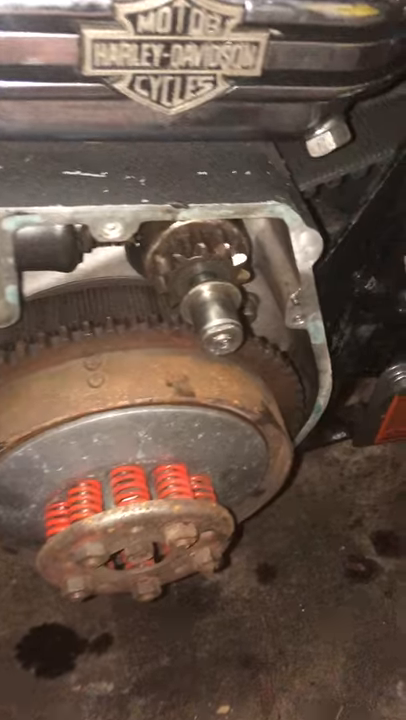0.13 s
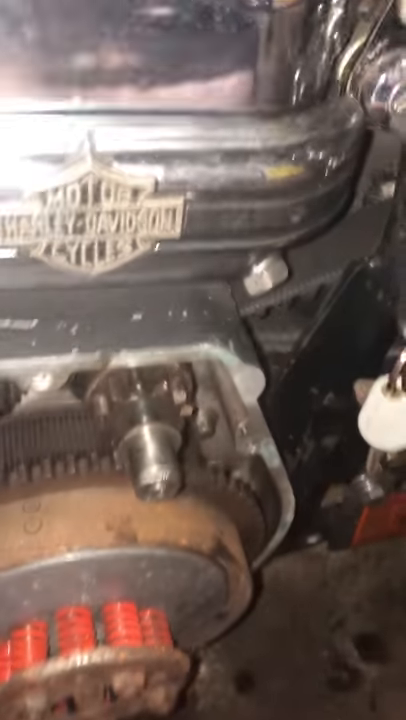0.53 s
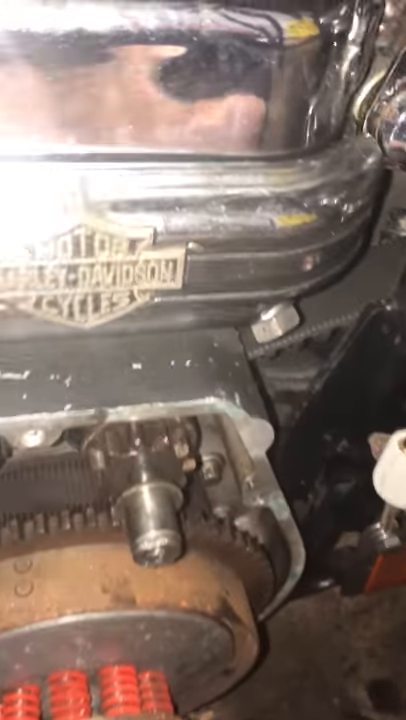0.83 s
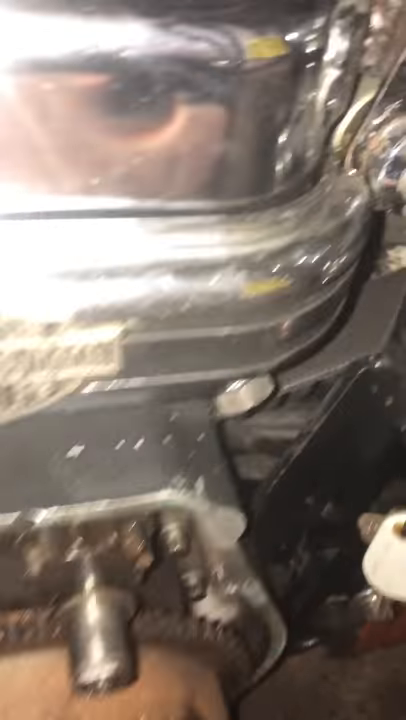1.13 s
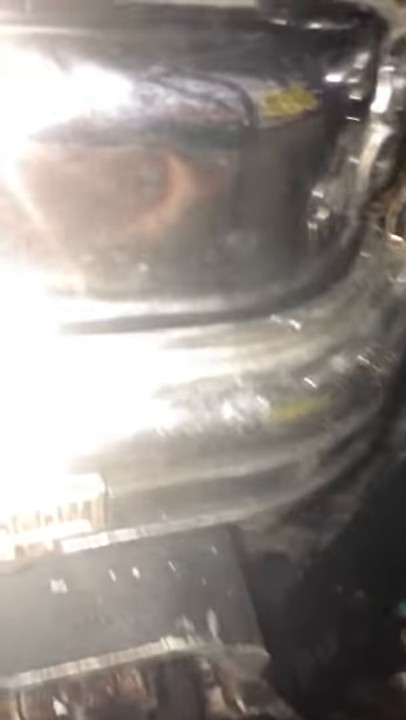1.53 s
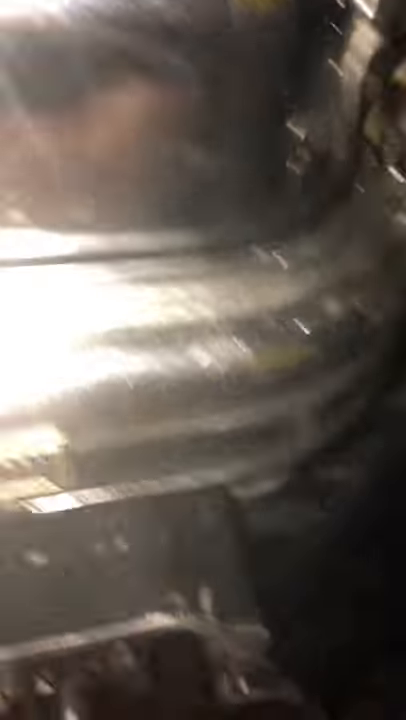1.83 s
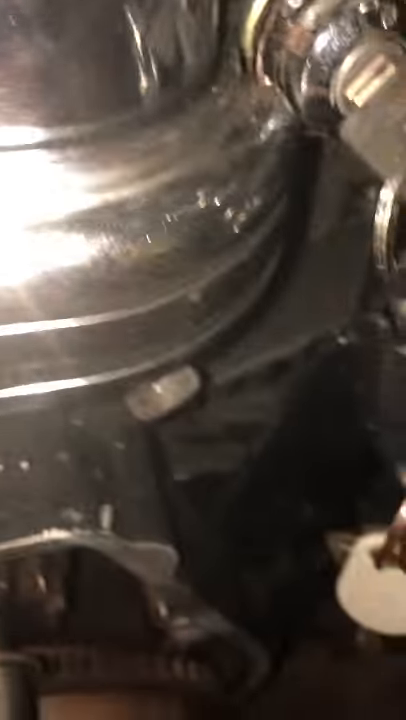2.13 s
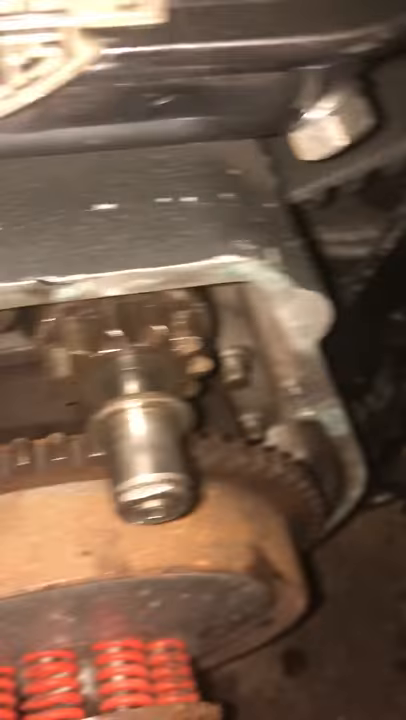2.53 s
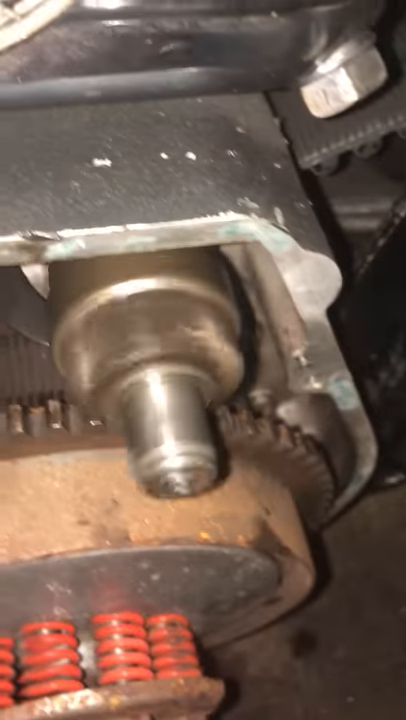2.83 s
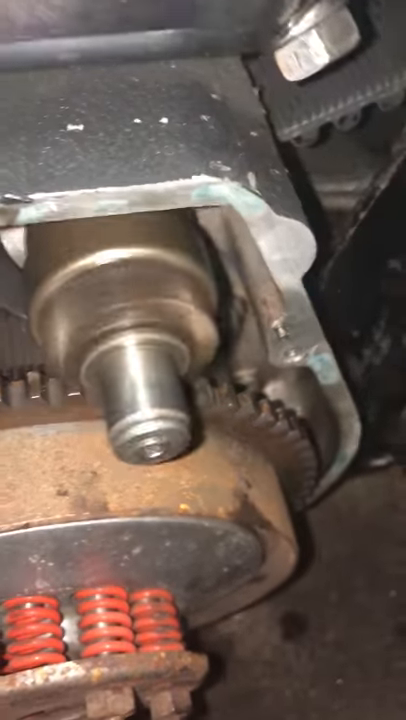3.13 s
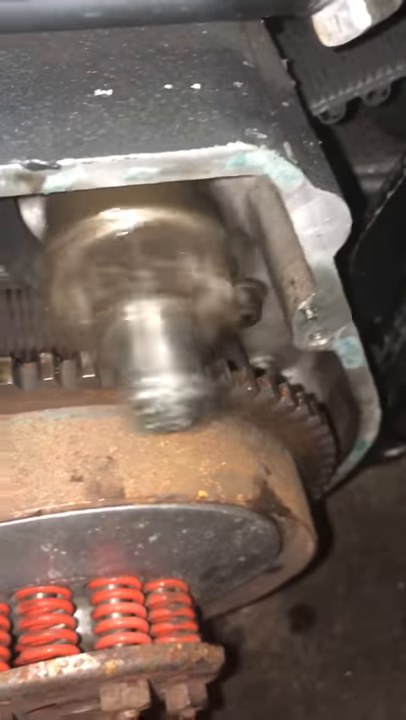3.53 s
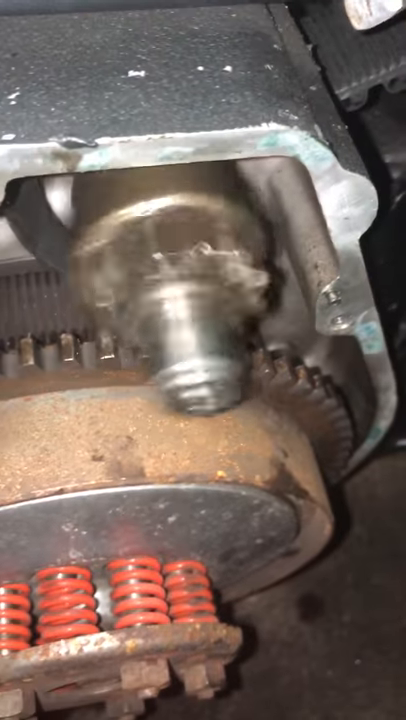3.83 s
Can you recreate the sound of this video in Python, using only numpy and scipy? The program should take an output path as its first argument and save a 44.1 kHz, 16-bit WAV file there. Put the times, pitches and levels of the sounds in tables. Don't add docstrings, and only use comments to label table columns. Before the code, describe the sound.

Starter motor slams its gear out, whines upward and chatters harshly after quiet handling clicks

```python
import sys
import numpy as np
from scipy import signal
from scipy.fft import rfft, irfft
from scipy.io import wavfile
from scipy.ndimage import uniform_filter1d

SR = 44100
rng = np.random.default_rng(int(sys.argv[2]) if len(sys.argv) > 2 else 0)


def ratio_of_db(decibels):
    return 10 ** (np.asarray(decibels, float) / 20)


def to_wav(s):
    ch = np.atleast_2d(s).T
    pcm = np.round(np.clip(ch, -1, 1) * 32767)
    wavfile.write(sys.argv[1], SR, pcm.astype(np.int16))


N = 176400
T = np.arange(N) / SR
START_S = 2.737

# f/Hz, level/dB
GRIND_SPECTRUM = [(250, -25.5), (1250, -9), (2200, -10), (3000, -12.5), (5500, -18.5), (15800, -32)]


def evened(x):
    return x / np.sqrt(np.mean(x ** 2) + 1e-20)


def curve(table, column):
    rows = np.array(table)
    return np.interp(T, rows[:, 0], rows[:, column])


def coloured(points):
    f, db = np.transpose(points)
    hz = np.fft.rfftfreq(N, 1 / SR)
    gain = ratio_of_db(np.interp(np.log(hz + 1), np.log(f), db, right=-90))
    return evened(irfft(rfft(rng.standard_normal(N)) * gain, N))


def resonate(x, hz, width):
    turn = np.exp(2j * np.pi * np.cumsum(hz * np.ones(len(x))) / SR)
    r = np.exp(-np.pi * width / SR)
    return 2 * (turn * signal.lfilter([1 - r], [1, -r], x / turn)).real


def fuzzy(hz, width):
    once = resonate(rng.standard_normal(N), hz, width)
    return evened(resonate(once, hz, width))


def bursts(times, dbs, t60, rise_s):
    spikes, t = np.zeros(N), T[:9000]
    np.add.at(spikes, (np.asarray(times) * SR).astype(int), ratio_of_db(dbs))
    envelope = (1 - np.exp(-t / rise_s)) * ratio_of_db(-60 * t / t60)
    return signal.oaconvolve(spikes, envelope)[:N]


def window(start, length, edge_s):
    return np.clip(np.minimum(T - start, start + length - T) / edge_s, 0, 1)


def rattle(depth_db, smooth):
    return ratio_of_db(depth_db * evened(uniform_filter1d(rng.standard_normal(N), int(smooth))))


def body(x, modes):
    out = 0
    for k, (hz, width, db) in enumerate(modes):
        out = out + (-1) ** k * ratio_of_db(db) * resonate(x, hz, width) / np.sqrt(width / 100)
    return out


def knocks(table, t60, rise_s, width):
    s, db, hz = np.transpose(table)
    pitch = hz[np.clip(np.searchsorted(s, T) - 1, 0, None)]
    tone = np.sin(2 * np.pi * np.cumsum(pitch * rattle(0.35, 90)) / SR)
    return bursts(s, db, t60, rise_s), tone + 0.6 * fuzzy(pitch, width)


def traffic():
    # f/Hz, level/dB
    night_spectrum = [(30, -10), (59, -2.5), (290, -22), (1000, -35), (4000, -45.5), (6500, -49.5),
                      (7500, -51.5), (15800, -52)]
    fading = ratio_of_db(-48.5 - 2 * np.minimum(T, 2))
    roar = fading * coloured(night_spectrum) * rattle(1, 3000)
    return roar + ratio_of_db(-63) * fuzzy(62.3, 3.6)


def horn():
    # f/Hz, level/dB
    partials = [(259, -63), (325, -59), (446, -58.5), (520, -60), (640, -66), (675, -64), (781, -63),
                (878, -61.5), (958, -59), (1028, -67.5), (1280, -67)]
    fade = 0.035
    return sum(ratio_of_db(db - fade * (hz - 106) * T) * fuzzy(hz, 11.0) for hz, db in partials)


def crickets():
    # f/Hz, width/Hz, level/dB
    chorus = [(4750, 540, -64.5), (5930, 580, -69)]
    # t/s, length/s, f/Hz, level/dB
    solos = [
        (0.26, 0.24, 5110, -62.5),
        (.78, 0.3, 4840, -67),
        (1.762, 0.25, 4750, -67),
        (2.326, 0.27, 5146, -60),
    ]
    far = sum(ratio_of_db(db) * fuzzy(hz, width) for hz, width, db in chorus) * rattle(0.42, 170)
    near = sum(ratio_of_db(db) * window(s, n, 0.04) * fuzzy(hz, 150) for s, n, hz, db in solos)
    return far + near * (1 + 0.55 * np.sin(2 * np.pi * 45 * T))


def rustle():
    # t/s, length/s, level/dB
    rubs = [
        (0.305, 0.13, -65),
        (0.687, 0.47, -65),
        (1.395, 0.33, -65.5),
    ]
    cloth = coloured([(500, 1.5), (1500, -6), (16000, -12)]) * rattle(3.7, 150)
    return cloth * sum(ratio_of_db(db) * window(s, n, n / 6.3) for s, n, db in rubs)


def clicks():
    # t/s, peak level/dB
    contacts = [(0.667, -44), (0.6949, -39.5), (0.951, -42.5), (1.19, -48), (1.205, -34.5), (1.2133, -27),
                (1.2354, -14.5), (1.2417, -23), (1.2545, -25), (1.403, -17), (1.4155, -16.5), (1.457, -36),
                (1.505, -36), (1.5279, -21), (1.691, -38.5), (1.732, -29), (2.3083, -43.5)]
    # f/Hz, level/dB
    click_spectrum = [(180, -42), (300, -15), (1580, -13), (1950, -9), (4800, -1.5), (6600, -12),
                      (9140, -5.5), (15800, -17)]
    s, db = np.transpose(contacts)
    snap = ratio_of_db(-8) * bursts(s, db, 0.01, 0.000069)
    tail = ratio_of_db(-22.5) * bursts(s, db, 0.06, 0.0037)
    ring = ratio_of_db(-18.5) * fuzzy(4210, 200) + ratio_of_db(-19) * fuzzy(2060, 450)
    return coloured(click_spectrum) * (snap + tail) + ring * bursts(s, db, 0.025, 0.0003)


def knuckles():
    # t/s, peak level/dB, f/Hz
    taps = [
        (0.695, -53, 2320),
        (1.114, -48, 1820),
        (1.12, -53, 2437),
        (1.237, -39, 1110),
        (1.2655, -34.5, 1190),
        (1.434, -51, 2070),
        (1.505, -35, 2030),
        (2.30, -43, 304),
    ]
    shape, ring = knocks(taps, 0.016, 0.001, 500)
    return shape * ring


def squeaks():
    # t/s, length/s, first f/Hz, last f/Hz, level/dB
    glides = [
        (.84, .06, 13300, 13200, -77),
        (.83, .14, 11000, 11900, -77),
        (1.0, .04, 11800, 9800, -74),
        (3.0, .27, 12200, 12200, -47),
        (.88, .16, 2150, 2200, -73),
        (2.29, .04, 330, 290, -55),
    ]
    out = 0
    for s, n, first_hz, last_hz, db in glides:
        glide = fuzzy(np.interp(T, [s, s + n], [first_hz, last_hz]), 100)
        out = out + ratio_of_db(db) * window(s, n, n / 5) * glide
    return out


def tooth_strikes():
    # t/s, peak level/dB, gear ring level/dB
    engage = [(2.7285, -22, -20), (2.7381, 0, -1), (2.7545, -1.5, -40), (2.771, 1, -30), (2.8014, -30, 15),
              (2.8125, -27, -7), (2.8195, -20, -20), (2.8262, -4.5, -19), (2.837, -7.5, 10),
              (2.8543, -8.5, -6), (2.8707, 3, -7), (2.879, -25, -20), (2.891, -8, -6), (2.9175, -12, 4.5),
              (2.9205, -6, -15), (2.936, -15.5, 7), (2.9395, -0.5, -4), (2.9569, -14, 7),
              (2.9856, -16.5, 5), (3.128, -13, -22), (3.1759, -9.5, -29), (3.2213, -3, -43.5),
              (3.2684, -0.5, -3), (3.2881, -8.5, 4), (3.3115, 0, -12), (3.339, -15, -15), (3.3445, -4, -11),
              (3.3583, -4, -20), (3.3671, -0.5, -23)]
    # t/s, peak level/dB
    chatter = [(3.3253, -14.5), (3.3824, -6), (3.3959, -8), (3.4128, -3.5), (3.4305, -4), (3.4437, -5),
               (3.4624, -6.5), (3.475, -4.5), (3.4878, -4), (3.4991, -3.5), (3.5107, -11), (3.5222, -10.5),
               (3.5393, -6.5), (3.5526, -4.5), (3.7243, -6), (3.7374, -7.5), (3.7498, -5.5), (3.7639, -6),
               (3.7753, -6), (3.7861, -7), (3.798, -9), (3.8094, -7.5)]
    # t/s, peak level/dB
    coast = [(3.829, -9), (3.847, -13), (3.851, -7), (3.865, -17), (3.872, -7.5), (3.893, -7), (3.9, -15),
             (3.9186, -5), (3.927, -13), (3.9429, -4.5), (3.956, -16), (3.9717, -9), (3.987, -18)]
    # t/s, strike rate/Hz, peak level/dB
    skipping = [
        (3.56, 130.7, -6.5),
        (3.62, 132, -6.5),
        (3.67, 130, -8.5),
        (3.72, 107, -5.5),
    ]
    first_s, last_s = skipping[0][0], skipping[-1][0]
    rate = curve(skipping, 1) * window(first_s, last_s - first_s, 1e-4)
    at = np.flatnonzero(np.diff(np.floor(np.cumsum(rate) / SR)))
    buzz_s = at / SR + 0.0006 * rng.standard_normal(len(at))
    buzz_db = curve(skipping, 2)[at]
    later = np.vstack([np.c_[buzz_s, buzz_db + rng.standard_normal(len(at))], chatter, coast])
    ring_db = -11 + 4 * rng.standard_normal(len(later))
    return np.vstack([engage, np.c_[later, ring_db]]).T


def teeth():
    # f/Hz, level/dB
    strike_spectrum = [(700, -11.5), (2500, -7), (3200, -17), (4500, -2.5), (9600, -5.5), (12500, -6.5),
                       (15800, -6)]
    # f/Hz, level/dB
    gear_modes = [(4080, -6), (4780, -8.5), (6400, 1), (7300, -11.5), (9080, -3.5), (10900, -4.5)]
    # t/s, level/dB
    singing = [
        (3.4, -4.5),
        (3.6, 5),
        (3.8, 4),
        (3.85, 0),
    ]
    # f/Hz, width/Hz, level/dB
    case_modes = [(542, 75, -7.5), (1048, 99, -2.5), (1367, 48, -7.5), (1490, 85, -3.5), (2057, 54, -7)]
    s, db, ring_db = tooth_strikes()
    shape = bursts(s, db, 0.026, 0.0013)
    grit = rattle(1.5, 40)
    white = rng.standard_normal((4, N)) * grit
    tail = ratio_of_db(-19.5) * bursts(s, db, 0.16, 0.017)
    out = ratio_of_db(-9.0) * coloured(strike_spectrum) * grit * (shape + tail)
    for hz, gear_db in gear_modes:
        uneven_db = db + 3 * rng.standard_normal(len(s))
        struck = white[0] * bursts(s, uneven_db, 0.018, 0.00083)
        out += ratio_of_db(0.5 + gear_db) * resonate(struck, hz, 514)
    ring = white[1] * bursts(s, db + ring_db, 0.039, 0.00042)
    out += ratio_of_db(9.5) * resonate(ring, 9935, 310)
    out += ratio_of_db(4 + curve(singing, 1)) * resonate(white[2] * shape, 8130, 240)
    out += ratio_of_db(3) * body(white[3] * bursts(s, db, 0.045, 0.002), case_modes)
    return signal.sosfilt(signal.butter(3, 450, "high", fs=SR, output="sos"), out)


def motor_load():
    # t/s, drone level/dB, grind level/dB
    load = [(2.74, -30.5, -39.5), (2.96, -28, -35), (3.0, -21, -28), (3.26, -25.5, -28.5),
            (3.33, -40, -31.5), (3.53, -33, -29), (3.62, -58, -26), (3.78, -34, -33), (3.9, -30.5, -38),
            (4, -37.5, -31)]
    # f/Hz, width/Hz, level/dB
    drone_modes = [(546, 51, -15), (1108, 46, -1.5), (1380, 29, -1), (1488, 99, 0.5), (1664, 160, -5.5),
                   (2034, 45, -17.5)]
    hum = body(rng.standard_normal(N) * rattle(1.5, 200), drone_modes)
    drone = ratio_of_db(curve(load, 1)) * evened(resonate(hum, 1450, 900))
    grind = ratio_of_db(curve(load, 2)) * coloured(GRIND_SPECTRUM) * rattle(2, 60)
    return window(START_S, 3, 0.011) * (drone + grind)


def blows():
    # t/s, peak level/dB, f/Hz
    impacts = [(2.741, -14, 579), (2.752, -11.5, 2150), (2.771, -5.5, 1490), (2.783, -12, 2292),
               (2.792, -3, 1480), (2.819, 1.5, 1445), (2.826, 3.5, 2185), (2.833, -17.5, 582),
               (2.858, -9, 2070), (2.877, -5.5, 1133), (2.891, -1, 2170), (2.896, -23, 1490),
               (2.909, -6, 1464), (2.916, -5.5, 1453), (2.984, -9.5, 1366), (3.016, -14, 1490),
               (3.128, -4.5, 1373), (3.22, -4.5, 1380), (3.257, -9, 1520), (3.288, -21, 1390),
               (3.304, -3.5, 1405), (3.338, -12.5, 2010), (3.362, -10, 950), (3.466, -9, 1030),
               (3.502, -13, 1353), (3.567, -12, 1480), (3.582, -14, 1028), (3.68, -20, 1005),
               (3.698, -10.5, 982), (3.712, -13, 992), (3.749, -7.5, 2051), (3.788, -21, 1028),
               (3.803, -22, 999), (3.831, -15, 963), (3.846, -19, 1003), (3.864, -12, 1385),
               (3.897, -11, 1400), (3.923, -15, 1497), (3.976, -14.5, 1406)]
    shape, ring = knocks(impacts, 0.023, 0.006, 150)
    return ratio_of_db(5) * shape * (ring + ratio_of_db(-2.5) * coloured(GRIND_SPECTRUM))


def frame_shake():
    # t/s, level/dB
    thumps = [(2.767, -20), (2.799, -26), (2.906, -26), (2.962, -24.5), (3.36, -24.5), (3.459, -25),
              (3.503, -35), (3.592, -22), (3.625, -29), (3.691, -24)]
    # f/Hz, level/dB
    shake_spectrum = [(40, -20), (120, -4), (300, -9.5), (1000, -3)]
    return coloured(shake_spectrum) * bursts(*np.transpose(thumps), 0.14, 0.006)


def commutator_whine():
    # t/s, commutator f/Hz, level/dB
    spin = [
        (2.99, 1530, -37),
        (3.04, 1720, -39),
        (3.11, 2000, -33),
        (3.17, 2170, -35),
        (3.28, 2400, -38),
    ]
    # multiple of the commutator frequency, level/dB
    partials = [(.5, 0), (1, 8), (2, 0), (2.999, 2), (3.7, 0)]
    # f/Hz, level/dB
    transmission = [(1800, -8), (2120, 2), (2400, -10), (3350, 4), (3560, -12), (3800, 4), (4000, -12),
                    (5700, 2)]
    whine = 0
    for multiple, db in partials:
        hz = multiple * curve(spin, 1)
        path_db = np.interp(hz, *np.transpose(transmission)) - 9 * np.maximum(hz / 1000 - 5.9, 0)
        tone = np.sin(2 * np.pi * np.cumsum(hz * rattle(0.06, 200)) / SR)
        whine = whine + ratio_of_db(db + path_db) * tone * rattle(3.5, 400)
    return whine * ratio_of_db(curve(spin, 2)) * window(2.98, 0.3, 0.02)


def reverberation(near):
    t = T[:9000]
    tail = uniform_filter1d(rng.standard_normal(9000), size=3) * ratio_of_db(-60 * t / 0.32) * (t > 0.004)
    return ratio_of_db(-16.5) * signal.oaconvolve(near, tail / np.linalg.norm(tail))[:N]


def scene():
    night = traffic() + horn() + crickets()
    hand = rustle() + clicks() + knuckles() + squeaks()
    motor = motor_load() + frame_shake() + commutator_whine()
    near = hand + teeth() + motor + blows()
    ducking = ratio_of_db(-36 * window(START_S, 3, 0.19))
    return (near + reverberation(near) + night * ducking)[None]


def top_cut(x):
    return signal.sosfilt(signal.butter(12, 16810, fs=SR, output="sos"), x)


def record(dry):
    x = np.tanh(dry * window(0.081, 5, 0.0041) / 0.92) * 0.94
    x = signal.sosfilt(signal.butter(4, 42, "high", fs=SR, output="sos"), x)
    x = signal.sosfilt(signal.ellip(8, 0.5, 60, 15950, fs=SR, output="sos"), x)
    return top_cut(x)


dry = scene()
out = record(dry)
to_wav(out)
```